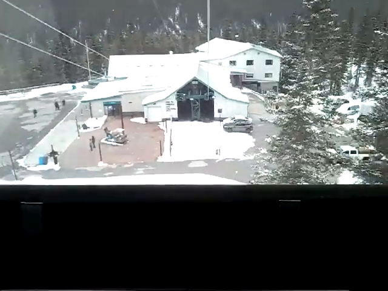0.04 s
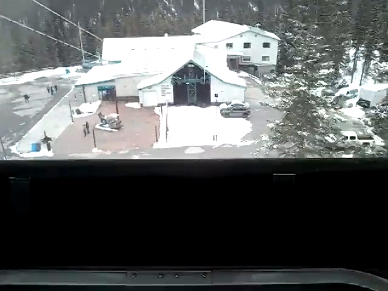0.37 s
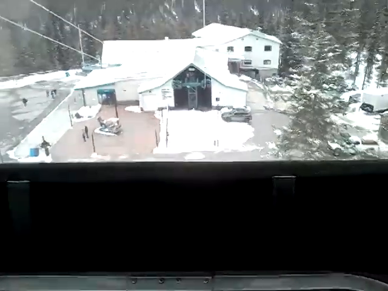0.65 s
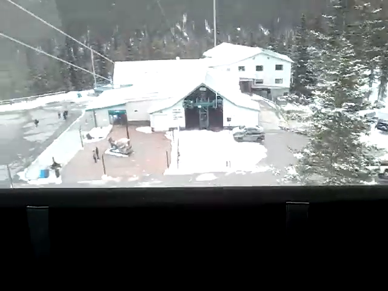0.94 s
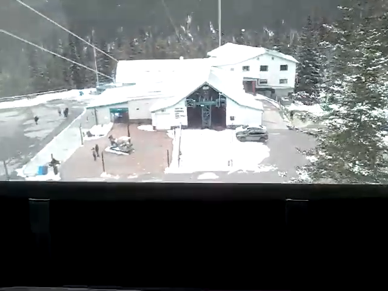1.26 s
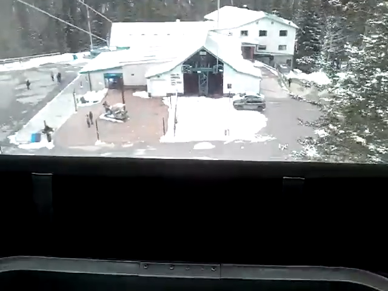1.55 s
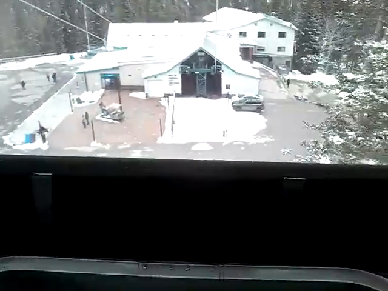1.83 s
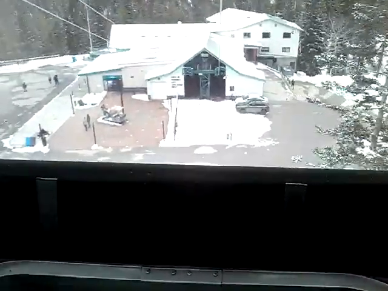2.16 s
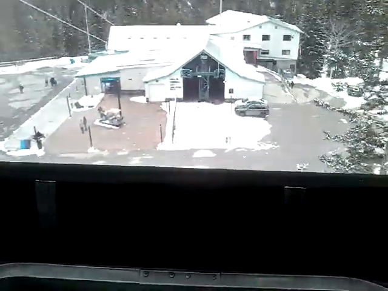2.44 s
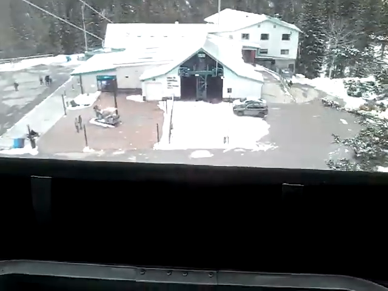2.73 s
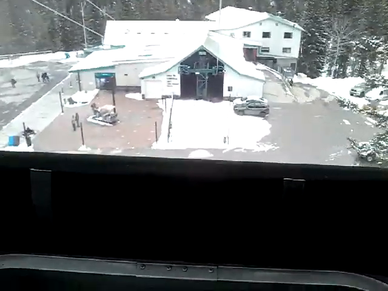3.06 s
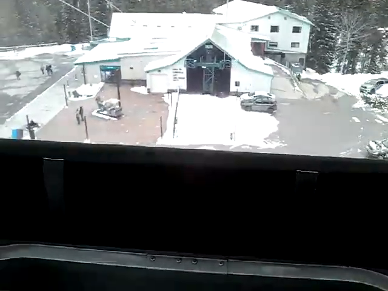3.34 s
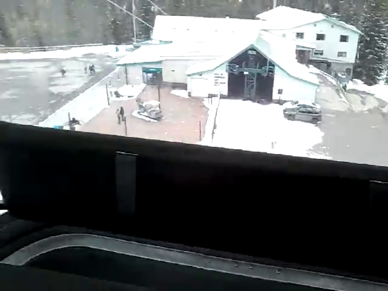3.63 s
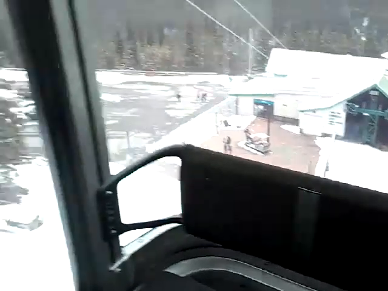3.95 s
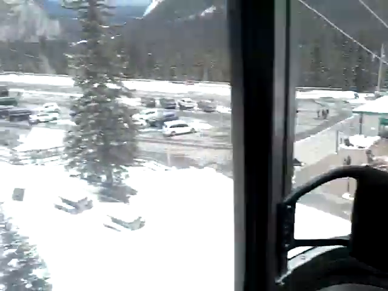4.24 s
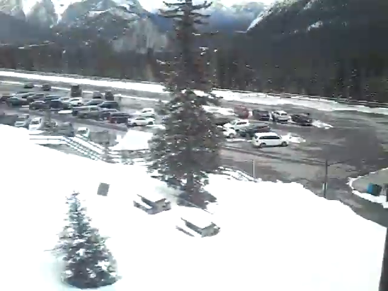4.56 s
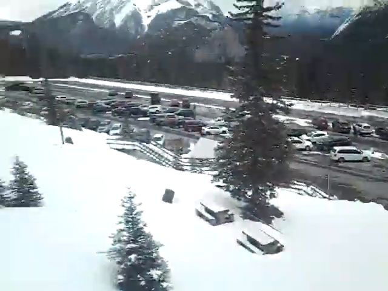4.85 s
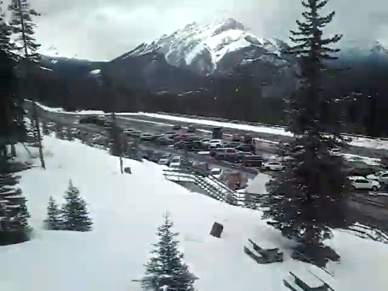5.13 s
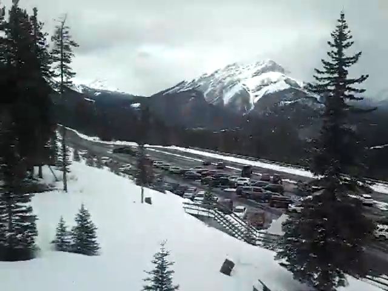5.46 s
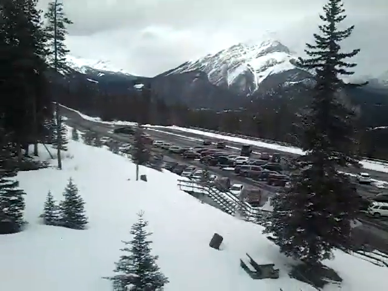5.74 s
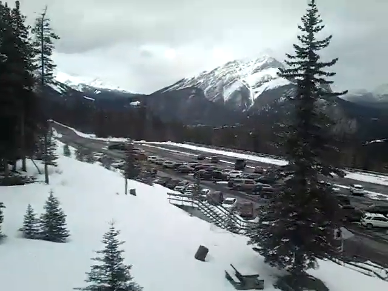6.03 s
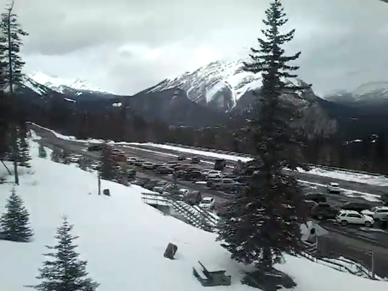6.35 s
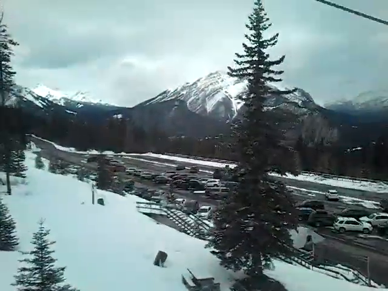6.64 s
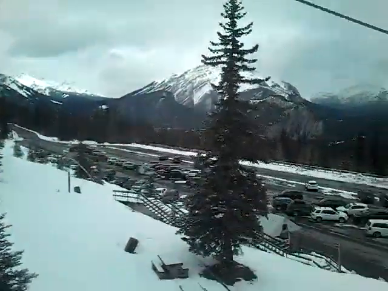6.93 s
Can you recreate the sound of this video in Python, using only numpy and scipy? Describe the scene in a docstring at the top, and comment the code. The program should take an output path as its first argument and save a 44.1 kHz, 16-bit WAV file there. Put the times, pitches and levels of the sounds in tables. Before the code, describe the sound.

A cable car cabin booms and drones steadily as it rides along, with a faint jacket swish partway through.

```python
"""Inside a moving cable car

The microphone rides in the cabin with a passenger. The haul rope shakes the hanger, the shell booms in
beating swells and the air rings in standing waves; machinery whines faintly and wind buffets outside.
Halfway the passenger turns from the front window to the side one: a jacket swishes and the microphone
meets other standing waves. Fittings rub faintly and tick now and then."""
import sys
import numpy as np
from scipy import signal
from scipy.fft import rfft, irfft, next_fast_len
from scipy.io import wavfile
from scipy.ndimage import uniform_filter1d

SR = 44100
rng = np.random.default_rng(int(sys.argv[2]) if len(sys.argv) > 2 else 0)


def put_to_file(sound):
    """Save the sound as 16-bit audio at rate SR, in the file named by the first command-line argument."""
    columns = np.atleast_2d(sound).T  # one column per channel
    safe = np.clip(columns, -1, 1)
    whole_steps = np.round(safe * 32767)
    wavfile.write(sys.argv[1], SR, whole_steps.astype(np.int16))


N = 317079
TIME = np.arange(N) / SR
BINS = np.fft.rfftfreq(2 * next_fast_len(N // 2 + 1), 1 / SR)

# The microphone's path. Each row: time in seconds, place (0 front window, 1 corner post, 2 side window;
# held within 0 to 2).
MIC_PATH = [(0, 0), (3.6, -0.11), (4.2, 0.65), (4.9, 1.5), (5.45, 2.5), (7.19, 2)]
# The microphone's own hiss. Each row: frequency in Hz, density in dB.
HISS_SPECTRUM = [(500, -106.1), (3000, -106), (5000, -106.8), (9000, -108.2), (15500, -109.3)]
# Colour of the wind outside. Each row: frequency in Hz, relative level in dB.
WIND_SPECTRUM = [(8, -25.5), (17, -3.5), (26, 2.5), (33, -2.5), (42, 1), (54, -3.5), (64, -24.5), (90, -23),
                 (500, -100)]
# Gusts on the shell. Each row: time in seconds, level in dB.
WIND_LEVELS = [(0, -46), (0.5, -36), (1.3, -39.5), (2.0, -39.5), (2.7, -32), (3.0, -39.5), (4.6, -34.5),
               (5.2, -33.5), (7.19, -37)]
# Machinery tones. Each row: pitch in Hz, level in dB at front window, corner post and side window.
WHINE_TONES = [(258.4, -66, -64, -61.5), (371.6, -61, -70, -70), (489, -70.5, -71, -66.5),
               (615, -70, -76, -75), (952, -91, -92, -76.5)]
# Slips of fittings and cloth. Each row: crest and half-length in seconds, pitch and width in Hz,
# level in dB.
RUB_SLIPS = [(1.66, 0.24, 1390, 160, -69), (3.10, 0.063, 1033, 16, -55.5), (3.197, 0.05, 1055, 9.1, -59.5),
             (3.335, 0.034, 1035, 8.9, -60), (3.742, 0.021, 2290, 120, -71), (4.42, .07, 1400, 170, -64),
             (4.57, 0.11, 1910, 110, -64), (4.627, .06, 2530, 200, -69)]
# The ring of a plastic fitting. Each row: pitch in Hz, relative level in dB, seconds to fall 60 dB.
FITTING_MODES = [(470, -2, 0.026), (760, 2, 0.0074), (1170, -1, 0.0076), (1950, -4.5, 0.006),
                 (2350, -9, 0.006), (3350, -12, 0.0067)]
# Ticks of that fitting. Each row: start in seconds, gain in dB, low cut in Hz.
FITTING_TICKS = [(5.4925, -33.5, 248), (6.681, -54, 1800), (6.733, -41.5, 1700)]
# Colour of the jacket's cloth. Each row: frequency in Hz, relative level in dB.
CLOTH_SPECTRUM = [(500, -15), (1000, -1.5), (1400, 4), (1560, -4), (1700, 1.5), (1820, -9), (1950, 2.5),
                  (2230, -5), (2500, -1.5), (3100, -6), (4300, -8), (6000, -25)]
# The sleeve sliding on the jacket. Each row: time in seconds, level in dB, centre in Hz.
SLEEVE_SLIDE = [(2.9, -100, 1300), (3.4, -84, 1300), (3.8, -69, 1290), (4.15, -62.5, 1500),
                (4.45, -58.5, 1650), (4.64, -59, 2020), (4.8, -66.5, 1720), (5.5, -69.5, 1600),
                (6.1, -100, 1600)]
# Smooth rush of passing air. Each row: frequency in Hz, density in dB.
RUSH_SPECTRUM = [(50, -66.5), (90, -55), (130, -58), (185, -68), (240, -77.5), (470, -85.5), (620, -87),
                 (730, -88), (1000, -94.5), (1400, -99), (1800, -99.5), (2800, -109), (6000, -125)]
# Cabin resonances. Each row: pitch and width in Hz, relative level in dB at front window, corner post
# and side window.
CABIN_RESONANCES = [(78.6, 21, -56.5, -56, -68.5), (144.55, 2.7, -40, -59, -72), (146.8, 4, -68, -44, -50),
                    (159.5, 14.4, -49.5, -61.5, -52.5), (177.4, 33, -59, -74, -62.5),
                    (190, 17, -65.5, -62.5, -58.5), (216, 6.8, -63.5, -85, -73),
                    (258, 9.5, -74.5, -64.5, -60.5), (294.6, 11, -78, -70, -67.5),
                    (327.3, 18, -67.5, -64.5, -64.5), (370, 22.3, -66.5, -70.5, -80.5),
                    (405, 31, -78.5, -75.5, -70), (441, 13.7, -74.5, -62.5, -81),
                    (490.6, 8.1, -71.5, -69, -65.5), (526, 25, -73.5, -66, -71), (582, 34, -78, -73, -83),
                    (610, 28, -73, -85.5, -76.5), (646, 18, -82, -78.5, -89), (686, 13, -77.5, -99, -96),
                    (947, 46, -87.5, -80, -85), (1056, 28, -88.5, -91, -99)]
# Running noise. Each row: time in seconds, level in dB of the low resonances and of the high ones.
RUNNING_LEVELS = [(0.1, -32, -49), (0.85, -37.5, -48.5), (1.9, -33, -48.5), (2.45, -33, -51),
                  (2.95, -31, -49), (4.2, -37, -48.5), (4.85, -40, -49), (5.1, -39, -53.5),
                  (5.35, -33.5, -54.5), (5.7, -38, -51.5), (6.8, -36.5, -50)]
# The shell's boom. Each row: pitch and width in Hz, relative level in dB at the same three places.
SHELL_MODES = [(107.2, 5.15, -2.5, -3.5, 3.5), (115.9, 7.2, -4, 2, -1.7)]
# The boom between its swells. Each row: time in seconds, level in dB.
BOOM_FLOOR = [(0, -30.5), (1.3, -30), (2.3, -29.5), (2.85, -23.5), (3.2, -26.5), (3.55, -35), (4.1, -29),
              (5.0, -25.5), (6.0, -26), (7.19, -27.5)]
# Swells of the low boom as its two close modes beat. Each row: crest and half-length in seconds,
# level in dB.
BOOM_SWELLS = [(0.184, 0.048, -26), (0.429, 0.1, -28.5), (0.576, 0.039, -24), (0.696, 0.062, -25),
               (0.985, 0.041, -25), (1.256, .085, -25.5), (1.548, 0.033, -22.5), (1.711, 0.062, -25),
               (1.93, 0.084, -23.5), (2.114, 0.076, -24), (2.388, 0.065, -21), (2.576, 0.073, -26),
               (2.75, 0.082, -23), (2.968, 0.056, -21.5), (3.058, 0.068, -22.5), (3.251, 0.075, -22.5),
               (3.895, 0.072, -23.5), (4.224, 0.078, -24), (4.326, 0.064, -21.5), (4.62, 0.039, -22.5),
               (4.743, 0.068, -26), (4.93, 0.1, -22.5), (5.022, 0.059, -21), (5.225, 0.073, -20),
               (5.365, 0.066, -28), (5.526, 0.076, -22), (5.722, 0.076, -20.5), (5.903, .075, -21.5),
               (6.038, 0.06, -25.5), (6.233, 0.07, -23.5), (6.347, 0.067, -18.5), (6.527, 0.051, -22),
               (6.72, .12, -26.5), (6.936, 0.079, -25), (7.055, 0.068, -24.5)]


def from_db(db):
    """Decibels to gain."""
    return 10 ** (np.asarray(db) / 20)


def rms_one(x):
    """Scale to unit power."""
    return x / np.sqrt(np.mean(x ** 2) + 1e-20)


def in_time(rows):
    """Each column of a curve at every sample."""
    times, *columns = np.transpose(rows)
    return [np.interp(TIME, times, column) for column in columns]


def spectrum(points):
    """Gain per frequency, drawn smoothly through the points."""
    hz, db = np.transpose(points)
    return from_db(np.interp(np.log(BINS + 1), np.log(hz), db))


def resonance(hz, width_hz):
    """Gain per frequency of a resonance applied twice: 1 on top, steep skirts."""
    detuning = (BINS ** 2 - hz ** 2) / (np.pi / 2 * width_hz * (BINS + 1))
    return 1 / (1 + detuning ** 2)


def noise(gain):
    """Noise whose amplitude per root hertz is the given gain."""
    white = rng.standard_normal(2 * (len(BINS) - 1))
    return irfft(rfft(white) * gain)[:N] * np.sqrt(SR / 2)


def drift(rate_hz):
    """Slow random wander with a spread of 1."""
    return rms_one(noise(1 / (1 + (BINS / rate_hz) ** 4)))


def evened(x, seconds):
    """Hold near unit power over stretches of this length; faster beating stays."""
    size = max(int(seconds * SR), 2)
    power = uniform_filter1d(uniform_filter1d(x ** 2, size), size)
    return x / np.sqrt(np.abs(power) + 1e-20)


def wind():
    """Gusts outside press on the shell, mostly below the cabin's lowest resonance."""
    level_db, = in_time(WIND_LEVELS)
    return from_db(level_db) * evened(noise(spectrum(WIND_SPECTRUM)), seconds=0.13)


def machinery_whine(place, waver=0.009, flicker_db=4):
    """Thin, wavering tones come along the rope, stronger or weaker at each place in the cabin."""
    out = 0
    for hz, *place_dbs in WHINE_TONES:
        pitch_hz = hz * (1 + waver * drift(rate_hz=4.08))
        phase = 2 * np.pi * np.cumsum(pitch_hz) / SR
        level_db = np.interp(place, [0, 1, 2], place_dbs) + flicker_db * drift(rate_hz=5.0)
        out += np.sqrt(2) * from_db(level_db) * np.sin(phase)
    return out


def rubs():
    """Fittings and cloth slip in faint squeaks and scrapes as the cabin sways and the passenger turns."""
    out = np.zeros(N)
    for crest, half_length, hz, width_hz, db in RUB_SLIPS:
        swell = np.exp(-2 * ((TIME - crest) / half_length) ** 2)
        out += from_db(db) * swell * evened(noise(resonance(hz, width_hz)), seconds=0.051)
    return out


def ticks(high_cut_hz):
    """Dull, quickly damped contacts of a plastic fitting; the light ones stir mainly its upper modes."""
    out, age = np.zeros(N), TIME[:SR // 10]
    ring = sum((-1) ** k * from_db(db - 60 * age / t60) * np.sin(2 * np.pi * hz * age)
               for k, (hz, db, t60) in enumerate(FITTING_MODES))
    for start, db, low_cut_hz in FITTING_TICKS:
        at = int(start * SR)
        contact = signal.butter(2, [low_cut_hz, high_cut_hz], "band", fs=SR, output="sos")
        out[at:at + len(age)] += from_db(db) * signal.sosfilt(contact, ring)
    return out


def jacket(grain_db, spread_octaves):
    """Threads catch and slip by the microphone; the swish brightens as the sleeve slides faster."""
    level_db, centre_hz = in_time(SLEEVE_SLIDE)
    cloth, swish = spectrum(CLOTH_SPECTRUM), 0
    for hz in np.geomspace(600, 6000, 10):
        in_band = np.abs(np.log((BINS + 1) / hz)) < np.log(10) / 18   # the bands meet edge to edge
        octaves_off = np.log2(hz / centre_hz)
        swish += noise(cloth * in_band) / np.sqrt(1 + (octaves_off / spread_octaves) ** 2)
    catching = rms_one(noise(1 / (1 + (BINS / 90) ** 2)))
    return from_db(level_db + grain_db * catching) * evened(swish, seconds=0.11)


def standing_waves(modes, place):
    """The microphone meets the same resonances at each place, with different strengths."""
    out = 0
    for spot in range(3):
        power = sum((from_db(dbs[spot]) * resonance(hz, width_hz)) ** 2 for hz, width_hz, *dbs in modes)
        nearness = np.clip(1 - np.abs(place - spot), 0, 1)
        out += np.sqrt(nearness) * noise(np.sqrt(power))
    return out


def cabin_air(place, split_hz=280):
    """All around, the rope drives the low resonances, passing air the higher ones and a smooth rush."""
    low_db, high_db = in_time(RUNNING_LEVELS)
    low_modes = [mode for mode in CABIN_RESONANCES if mode[0] < split_hz]
    high_modes = [mode for mode in CABIN_RESONANCES if mode[0] >= split_hz]
    drone = from_db(low_db) * evened(standing_waves(low_modes, place), seconds=0.21)
    ringing = from_db(high_db) * evened(standing_waves(high_modes, place), seconds=0.22)
    return drone + ringing + noise(spectrum(RUSH_SPECTRUM))


def boom_throb(flutter_db=1.66, lull_db=-7.5, lull_s=0.016, squareness=2.08):
    """Swells of the low boom as its two close modes beat, each between two lulls, on an uneven floor."""
    lulls, swells = np.zeros((2, N))
    for crest, half_length, db in BOOM_SWELLS:
        near = slice(*np.searchsorted(TIME, [crest - 2 * half_length, crest + 2 * half_length]))
        from_crest = np.abs(TIME[near] - crest)
        lull = np.exp(-((from_crest - 0.92 * half_length) / lull_s) ** 2)
        swell = from_db(db) * np.exp(-2 * (from_crest / half_length) ** squareness)
        lulls[near] = np.maximum(lulls[near], lull)
        swells[near] = np.maximum(swells[near], swell)
    floor_db = in_time(BOOM_FLOOR)[0] + flutter_db * drift(rate_hz=12.0) + lull_db * lulls
    return np.maximum(from_db(floor_db), swells)


def shell_boom(place):
    """Two close modes of the shell ring around the microphone in a low boom that swells and sags."""
    return boom_throb() * evened(standing_waves(SHELL_MODES, place), seconds=0.031)


def scene():
    """Everything at the one microphone in the cabin, over its own hiss."""
    place = np.clip(in_time(MIC_PATH)[0], 0, 2)
    small_sounds = jacket(grain_db=1.0, spread_octaves=0.37) + rubs() + ticks(high_cut_hz=3000)
    ride = shell_boom(place) + cabin_air(place) + machinery_whine(place) + wind()
    hiss = noise(spectrum(HISS_SPECTRUM))
    return (ride + small_sounds + hiss)[None]


def record(dry):
    """A low cut at 12 Hz, 3 ms fades against clicks at the ends and a steep high cut at 15750 Hz."""
    low_cut = signal.butter(2, 12, "high", fs=SR, output="sos")
    high_cut = signal.ellip(12, 0.1, 80, 15750, fs=SR, output="sos")
    from_edge = np.minimum(TIME, TIME[::-1])
    fades = np.sin(np.pi / 2 * np.clip(from_edge / 0.003, 0, 1)) ** 2
    return signal.sosfilt(high_cut, signal.sosfilt(low_cut, dry) * fades)


dry = scene()
out = record(dry)
put_to_file(out)
```